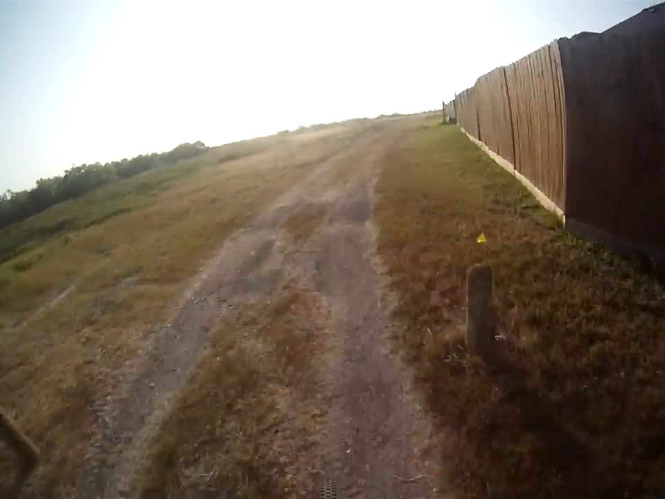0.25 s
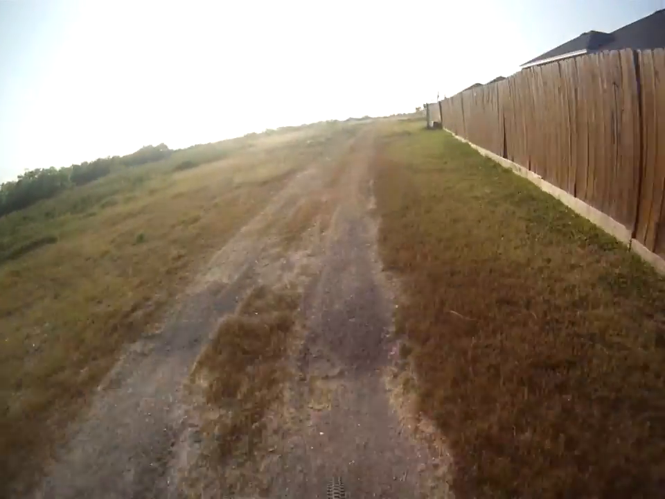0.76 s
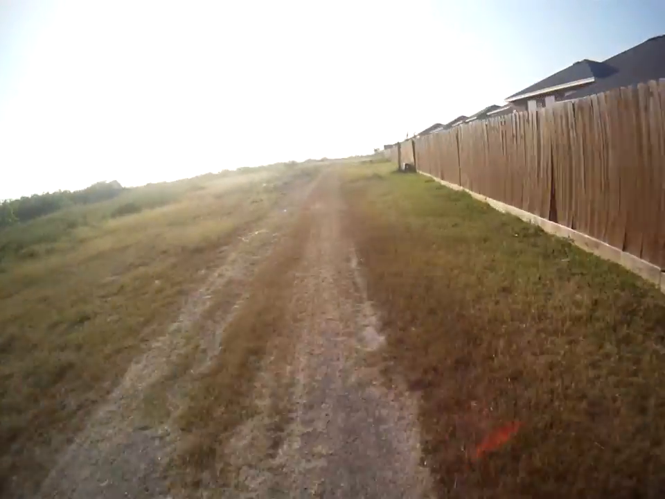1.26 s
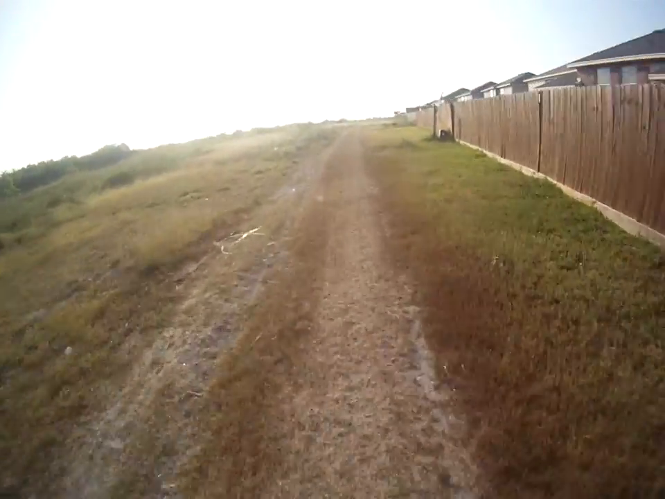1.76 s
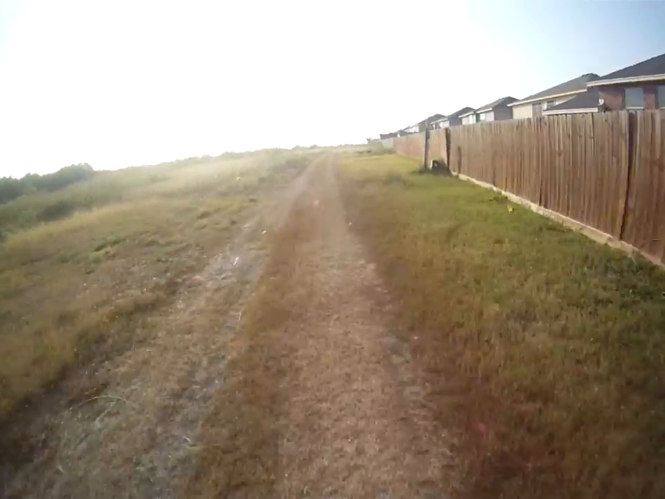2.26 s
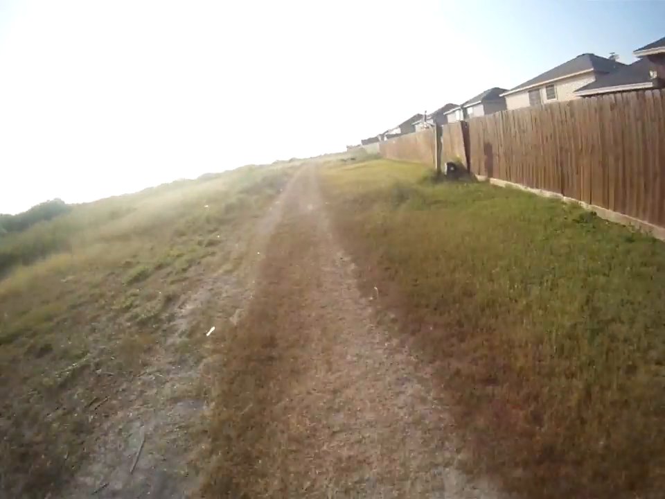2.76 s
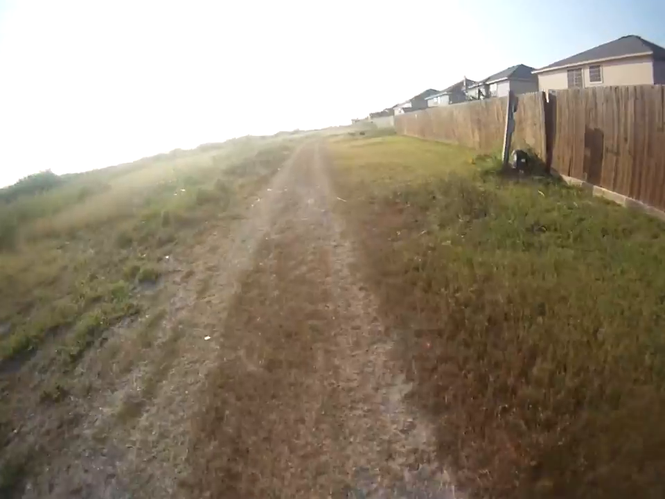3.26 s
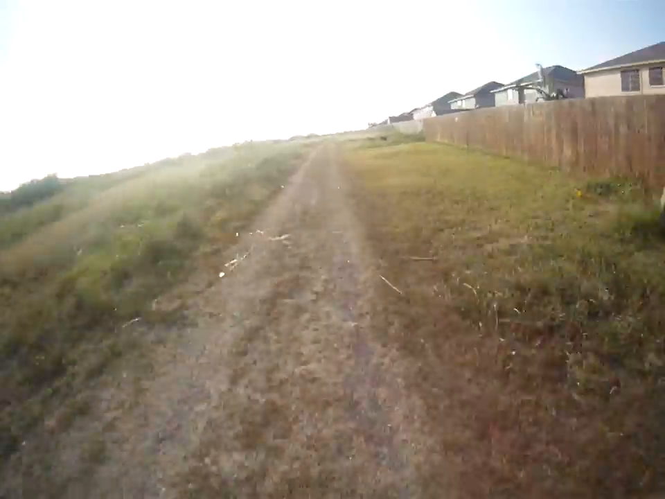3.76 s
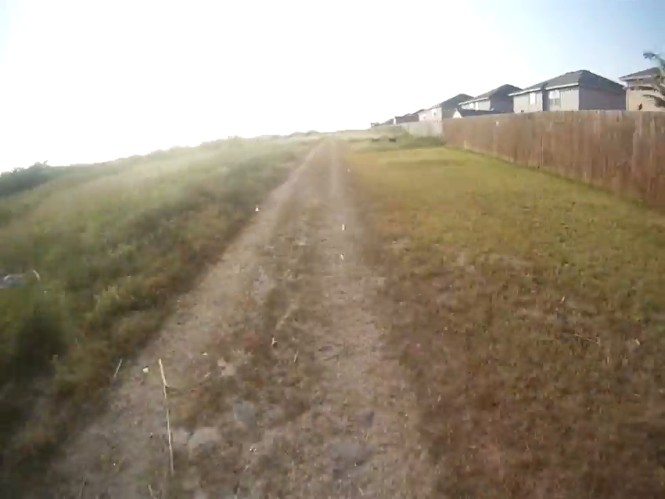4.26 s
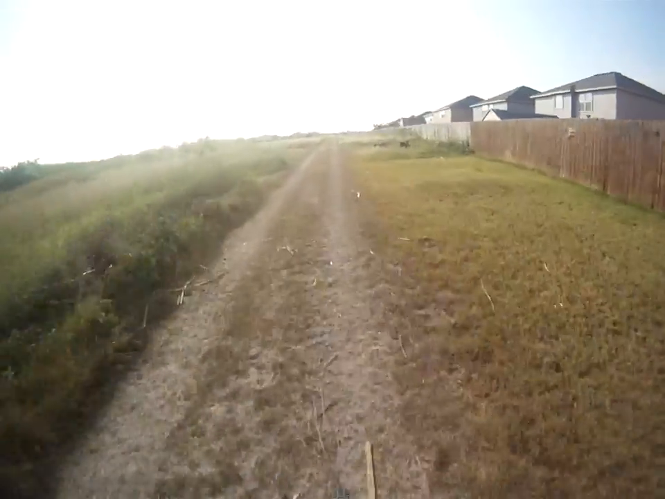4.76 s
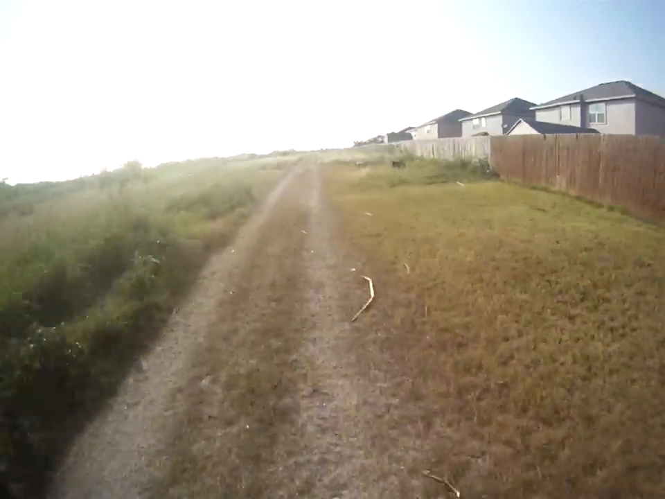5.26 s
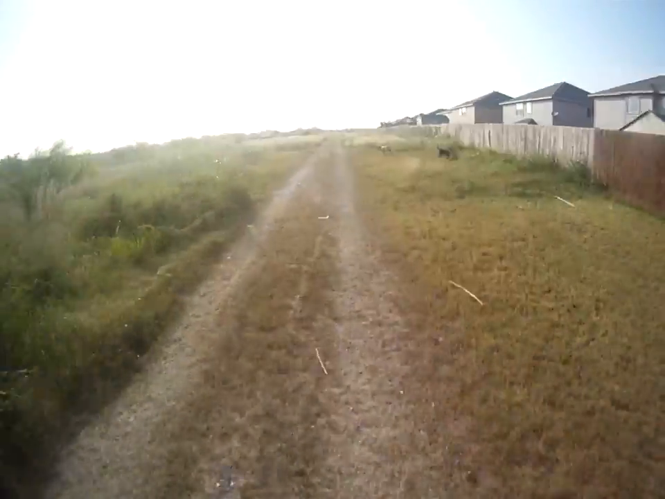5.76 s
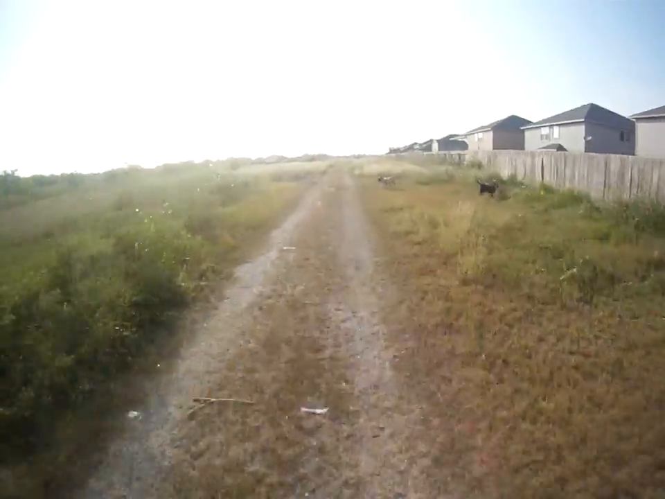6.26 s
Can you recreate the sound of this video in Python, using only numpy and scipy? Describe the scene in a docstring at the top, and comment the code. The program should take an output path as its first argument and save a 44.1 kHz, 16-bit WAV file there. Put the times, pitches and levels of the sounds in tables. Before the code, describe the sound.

A bicycle rides onto a rough dirt track, its mounted camera case clacking sharply over low thuds, wind rumble and faint gritty tyre hiss.

```python
"""A bicycle rolls from smooth ground onto a rough dirt track, heard from a small camera riding along.
Big bumps make the springy mount swing with low thuds, and its plastic case knocks and rings; stones jog it too.
Wind and the shuddering frame are shaped noise, tyres hiss over grit and dry grass, and twigs snap.
A brake squeaks faintly at first, as a tone with sliding harmonics, and the microphone adds hiss.
The camera samples coarsely, which mirrors every clack into the treble."""
import sys
import numpy as np
from scipy import signal
from scipy.fft import rfft, irfft
from scipy.io import wavfile

SR = 44100
rng = np.random.default_rng(int(sys.argv[2]) if len(sys.argv) > 2 else 0)


def unload_wav(signal):
    """Save mono or channel-first audio to the path in sys.argv[1] as 16-bit WAV at rate SR, clipped to [-1, 1]."""
    wavfile.write(
        sys.argv[1],
        SR,
        np.round(np.clip(np.atleast_2d(signal).T, -1, 1) * 32767).astype(np.int16),
    )


N = 287532

# wind on the case, level before an overall lift: [t/s, level/dB]
WIND_GUSTS = [(0.0, -38.5), (0.34, -52), (1.0, -46.5), (1.36, -50), (1.76, -45.5), (1.94, -48.5),
              (2.83, -52.5), (3.01, -48), (4.47, -40.5), (4.57, -35.5), (4.94, -42.5), (5.59, -42),
              (5.9, -32.5), (6.52, -46.5)]
# how rough the ground is, as the level of the tyres' hiss: [t/s, level/dB]
GROUND_ROUGHNESS = [(0.0, -58), (0.49, -61), (0.62, -59.5), (1.09, -59), (1.69, -64.5), (1.78, -61.5),
                    (2.4, -62), (3.98, -60), (4.54, -47.5), (4.83, -54), (5.54, -54), (5.74, -52.5),
                    (5.96, -56), (6.15, -55.5), (6.41, -50), (6.52, -50.5)]
# tone colour of each noise, relative level per Hz: [f/Hz, level/dB]
WIND_SPECTRUM = [(8, -10.5), (22, -5.5), (45, -1.5), (66, -5.5), (90, -17), (130, -29), (300, -40.5),
                 (900, -73.5)]
FRAME_SPECTRUM = [(60, 0.5), (130, -3), (260, -1.5), (400, -6), (620, -9.5), (1200, -19.5), (4000, -71)]
DIRT_SPECTRUM = [(200, -29.5), (600, -11.5), (850, -9.5), (1150, -2), (1500, -2), (2250, -2), (2650, -8.5),
                 (3100, -12.5), (3800, -16.5), (5500, -31.5)]
GRASS_SPECTRUM = [(300, -38), (680, -15), (850, -9), (1060, -2.5), (1300, -6), (2050, -6.5), (2550, -13.5),
                  (3400, -19.5), (4200, -30.5), (5500, -33.5)]
MIC_HISS_SPECTRUM = [(100, 2.5), (1500, -23.5), (3000, -9), (5200, -4.5), (5900, -11)]
# stalks and grit brush past, level before an overall cut: [t/s, length/s, level/dB]
BRUSHES = [(1.366, .033, -41), (1.586, .025, -51), (1.7, 0.046, -53.5), (1.949, 0.048, -54),
           (2.349, 0.072, -51), (2.651, 0.1, -53.5), (2.93, 0.084, -53), (3.535, .06, -51),
           (5.637, 0.095, -47), (5.864, 0.061, -48)]
# the case knocks against its mount: [t/s, peak level of the shell's clack/dB, of the dull push behind it/dB]
KNOCKS = [(0.0122, -14, -32), (0.27, -50, -42), (0.5146, -34.5, -30.5), (0.7888, -49, -31.5),
          (1.0439, -8.5, -26.5), (1.087, -27.5, -29), (1.1013, -38, -29.5), (1.3687, -32, -56),
          (1.5632, -27, -34), (1.6146, -36.5, -60), (1.7052, -42, -57), (1.7517, -42, -62),
          (1.8317, -26, -30), (1.859, -27, -29), (1.8624, -25.5, -23.5), (1.8721, 2, -21),
          (2.1331, -41.5, -44), (2.3126, -28, -28.5), (2.3316, -45.5, -35.5), (3.0877, -23.5, -44.5),
          (3.264, -53, -40.5), (3.455, -60, -32), (3.5337, -27.5, -28), (3.6621, -50, -34.5),
          (3.9385, -42, -32.5), (4.089, -37, -34), (4.1305, -33.5, -34.5), (4.1565, -34, -33.5),
          (4.4682, -27, -23), (4.4786, 0, -24), (4.597, -34, -30), (4.6328, -30.5, -30),
          (4.6485, -8.5, -28.5), (4.8648, -40, -33), (5.201, -24.5, -24), (5.2865, -29.5, -39),
          (5.3168, 1, -21.5), (5.366, -33.5, -33.5), (5.566, -62, -30.5), (5.6549, -32, -28),
          (5.6993, -6.5, -22), (5.7223, -13.5, -18.5), (5.8102, -10, -28.5), (5.9034, -42, -31.5),
          (5.987, -38, -32), (6.1933, -18, -18.5), (6.2381, -15.5, -30), (6.2418, -8, -25.5),
          (6.3257, -40, -41)]
# resonances of the shell, the mount, the dull push and the contact snap: [f/Hz, width/Hz, relative level/dB]
SHELL_MODES = [(1451, 190, -6.5), (1712, 430, 0.5), (1962, 284, -0.5), (2154, 107, -7.5), (2610, 370, -7.5),
               (3120, 220, -17.5)]
MOUNT_MODES = [(798, 207, -5.5), (1021, 136, -1), (1185, 430, -6)]
PUSH_MODES = [(126.7, 150, 1.5), (253.7, 111, -4), (443, 243, -9.5)]
SNAP_MODES = [(3200, 220, 2.5), (3706, 380, 3), (4920, 450, -7.5), (5660, 160, -21)]
# big bumps in the track shake the mount: [t/s, peak level/dB, f/Hz]
BUMPS = [(0.05, -24, 44.8), (0.104, -23.5, 54), (0.272, -32.5, 63), (0.527, -27, 55), (0.696, -34, 47),
         (1.047, -23, 43.2), (1.117, -24.5, 54.6), (1.573, -22, 54), (1.86, -13.5, 50.1), (2.33, -34, 55),
         (2.866, -31.5, 48.5), (2.934, -31, 61.5), (3.54, -30, 56.4), (3.663, -26, 62),
         (3.945, -24.5, 56.5), (4.131, -24, 44), (4.206, -25, 55.7), (4.391, -29, 57), (4.468, -16.5, 55.6),
         (4.611, -24.5, 64.7), (4.652, -22, 49.7), (4.728, -25.5, 59), (4.986, -26, 47.7), (5.2, -24, 41.5),
         (5.312, -19.5, 49), (5.718, -13.5, 47.2), (5.815, -20.5, 63), (5.873, -20, 50.3),
         (6.045, -12, 58.4), (6.197, -11.5, 58), (6.247, -21, 48.4), (6.361, -18, 55.3)]
# the brake rubs twice, each a curve before the brake arm shapes it: [t/s, f/Hz, level/dB]
BRAKE_RUBS = [
    [(.06, 1010, -61), (.095, 985, -59), (.148, 1140, -53), (.175, 975, -63), (.209, 900, -71)],
    [(.27, 1100, -70), (.291, 1086, -55), (.329, 971, -58.5), (.379, 966, -64), (.43, 1021, -55.5),
     (.48, 1067, -61), (.545, 1016, -57), (.6, 795, -72)],
]
# how well the brake arm radiates: [f/Hz, level/dB]
BRAKE_ARM_RESPONSE = [(1000, -23), (1500, -11), (1950, -1.5), (2300, 2), (2700, -17), (3150, -16),
                      (3500, -10), (3850, -9), (4200, -28), (4600, -25)]
# dry twigs snap under the tyres, peak of the first snap: [about t/s, level/dB, main f/Hz]
TWIGS = [(1.21, -52, 3500), (1.764, -54, 4300), (2.378, -50, 4450), (2.972, -52, 3200), (3.008, -51, 3200),
         (4.524, -47, 3700), (5.906, -43, 5600), (6.031, -50, 3400), (6.16, -49, 3700)]

CAMERA_HZ, EDGE_HZ = 12000, 15500  # the camera's sampling rate, and the top edge of what it passes on
SMOOTH_DB = -61  # ground level that counts as smooth
# frame and rattles follow the ground: level on smooth ground (dB), dB gained per dB of roughness
FRAME_DB, FRAME_FOLLOWS = -63, 0.49
RATTLE_DB, RATTLE_FOLLOWS = -55.5, 0.58
REFERENCE_DB = -30  # clack and push level that the snap and graze settings start from
# contact snap: level at the reference (dB), dB gained per dB of clack, dB lost per dB of cushioning push
SNAP_DB, SNAP_PER_CLACK, SNAP_CUSHION = -52.5, 1, 0.21
# the mount rings this far over the clack, but no further than this over the push (dB)
MOUNT_OVER_CLACK_DB, MOUNT_OVER_PUSH_DB = 0.5, 6.5
# the case grazes its stop before landing: lead (s), level at the reference (dB), dB gained per dB of clack
GRAZE_S, GRAZE_DB, GRAZE_PER_CLACK = .0032, -42, 0.43
SPREAD_DB = 2  # each blow lands a little differently: spread of its resonances' levels


def amp(db):
    """Turns decibels into gain."""
    return 10 ** (np.asarray(db) / 20)


def evened(x):
    """Scales a sound to an average (rms) strength of 1."""
    return x / np.sqrt(np.mean(x ** 2) + 1e-20)


def add(mix, start_s, sound):
    """Mixes a sound in at a moment given in seconds."""
    part = mix[max(round(start_s * SR), 0):][:len(sound)]
    part += sound[:len(part)]


def curve(rows):
    """Joins rows of (seconds, value) with straight lines, one value a sample."""
    return np.interp(np.arange(N) / SR, *np.transpose(rows))


def coloured(x, spectrum):
    """Makes some pitches of a noise stronger than others, at rms 1."""
    hz, db = np.transpose(spectrum)
    f = np.fft.rfftfreq(len(x), 1 / SR)
    gain = amp(np.interp(np.log(f + 1), np.log(hz), db))
    return evened(irfft(rfft(x) * gain, len(x)))


def wander(rate_hz):
    """Drifts smoothly at random with rms 1, up to about this rate."""
    f = np.fft.rfftfreq(N, 1 / SR)
    slowed = rfft(rng.standard_normal(N)) / (1 + (f / rate_hz) ** 4)
    return evened(irfft(slowed, N))


def ring(modes, spread_db, detune, damping=1, size=4096):
    """A blow on a set of resonances, peak 1; more damping widens them, so they die away sooner."""
    f = abs(np.fft.fftfreq(size, 1 / SR))
    gain = np.zeros(size)
    for hz, width, db in modes:
        centre = hz * (1 + detune * rng.standard_normal())
        off = 2 * (f - centre) / (width * damping)
        gain += amp(db + spread_db * rng.standard_normal()) / (1 + off ** 2) ** 1.53
    # choose the phases that put the energy right after the blow
    spectrum = np.exp(np.conj(signal.hilbert(np.log(gain + 1e-5))))
    causal = np.fft.ifft(spectrum).real
    return causal / abs(signal.hilbert(causal)).max()


def wind_rumble(wind_db=3, gust_db=3.0):
    """Wind buffets the case: low noise that swells with the gusts."""
    level = curve(WIND_GUSTS) + wind_db + gust_db * wander(5)
    return coloured(rng.standard_normal(N), WIND_SPECTRUM) * amp(level)


def frame_shudder():
    """The frame shudders over the ground: low noise, stronger where it is rough."""
    level = FRAME_DB + FRAME_FOLLOWS * (curve(GROUND_ROUGHNESS) - SMOOTH_DB)
    shudder = amp(1.6 * wander(25))
    return coloured(rng.standard_normal(N), FRAME_SPECTRUM) * amp(level) * shudder


def tyres(grit_per_s=350, grit_spread_db=2.0, grit=0.47, brush_db=-3, bare_db=-62, grassy_db=-55, patchy_db=1.5):
    """Tyres crush grit and dry grass: a wash of noise with small snaps, and stalks that swish by."""
    ground = amp(curve(GROUND_ROUGHNESS))
    snap_size = amp(grit_spread_db * np.minimum(rng.exponential(1, N), 4))
    snap_happens = rng.random(N) < grit_per_s / SR
    snaps = rng.standard_normal(N) * snap_size * snap_happens
    crunch = rng.standard_normal(N) + grit * evened(snaps)
    # louder ground sounds more like grass than dirt
    grassy = np.interp(ground, amp([bare_db, grassy_db]), [0, 1])
    dirt = np.sqrt(1 - grassy) * coloured(crunch, DIRT_SPECTRUM)
    grass = np.sqrt(grassy) * coloured(crunch[::-1], GRASS_SPECTRUM)  # reversed, so it differs from the dirt
    swish = np.zeros(N)
    for s, length, db in BRUSHES:
        u = np.arange(SR // 3) / SR / length
        add(swish, s, amp(db + brush_db) * (1 - np.exp(-20 * u)) * np.exp(-u ** 2))
    flutter = amp(.9 * wander(45))
    catching = amp(3 * wander(160))
    patchy_ground = amp(patchy_db * wander(6)) * ground
    return (dirt + grass) * flutter * np.hypot(patchy_ground, swish * catching)


def microphone_hiss():
    """The microphone's own steady, faint noise."""
    return amp(-66.5) * coloured(rng.standard_normal(N), MIC_HISS_SPECTRUM)


def knocks(rebound_s=0.002008, rebound=0.38, light_damping=2.22, chatter=0.86, mount_chatter=.3):
    """The case grazes, then rings shell and mount; hard knocks rebound once off the stop, light ones chatter."""
    out = np.zeros(N)
    for s, clack, push in KNOCKS:
        hard, heavy = clack - REFERENCE_DB, push - REFERENCE_DB
        mount_db = min(clack + MOUNT_OVER_CLACK_DB, push + MOUNT_OVER_PUSH_DB)
        snap_db = SNAP_DB + SNAP_PER_CLACK * hard - SNAP_CUSHION * heavy
        graze_db = GRAZE_DB + GRAZE_PER_CLACK * hard
        light = clack < -20
        detune = .04 if light else .007
        damping = light_damping if light else 1

        shell = amp(clack) * ring(SHELL_MODES, SPREAD_DB, detune, damping)
        snap = amp(snap_db) * ring(SNAP_MODES, SPREAD_DB, 0.025)
        case = shell + snap
        mount = -amp(mount_db) * ring(MOUNT_MODES, SPREAD_DB, 0.036, damping)
        graze = amp(graze_db) * ring(SHELL_MODES + MOUNT_MODES, SPREAD_DB, .04, light_damping)
        add(out, s - GRAZE_S, graze)
        add(out, s, case + mount)
        # the push begins half a millisecond before the clack
        add(out, s - .0005, -amp(push) * ring(PUSH_MODES, SPREAD_DB, 0.068))
        if light:
            for k, late in enumerate(np.cumsum(rng.uniform(.0008, .003, size=3))):
                add(out, s + late, (chatter * case + mount_chatter * mount) / (k + 1))
        else:
            add(out, s + rebound_s, rebound * case)
    return out


def bumps(rise_s=0.036, decay_s=0.016):
    """The springy mount swings a few times after each bump, a low thud that soon dies away."""
    out, t = np.zeros(N), np.arange(SR // 4) / SR
    for s, db, hz in BUMPS:
        swing = -np.sin(2 * np.pi * hz * t) * (1 - np.exp(-t / rise_s)) * np.exp(-t / decay_s)
        add(out, s, amp(db) * swing / abs(swing).max())
    return out


def brake_squeak():
    """The brake sticks and slips: a thin tone whose harmonics slide through the brake arm's resonances."""
    out, t = np.zeros(N), np.arange(N) / SR
    for rub in BRAKE_RUBS:
        s, hz, db = np.transpose(rub)
        pitch = np.interp(t, s, hz) * (1 + .006 * wander(150))
        turns = np.cumsum(pitch) / SR
        tone = np.zeros(N)
        for k in range(1, 6):
            arm_db = np.interp(k * pitch, *np.transpose(BRAKE_ARM_RESPONSE))
            tone += amp(arm_db) * np.sin(2 * np.pi * k * turns)
        level = amp(np.interp(t, s, db) + wander(60))
        rubbing = (t > s[0]) * (t < s[-1])
        out += np.sqrt(2) * tone * level * rubbing
    return out


def rattles(count=20, spread_db=3, push_db=5):
    """Small stones jog the case at random moments, harder on rough ground."""
    out = np.zeros(N)
    level = RATTLE_DB + RATTLE_FOLLOWS * (curve(GROUND_ROUGHNESS) - SMOOTH_DB)
    for at in rng.integers(0, N, count):
        shell = ring(SHELL_MODES, SPREAD_DB, .04, 2.4)
        push = amp(push_db) * ring(PUSH_MODES, SPREAD_DB, 0.059)
        strength = amp(level[at] + spread_db * rng.standard_normal())
        add(out, at / SR, strength * (shell - push))
    return out


def twigs():
    """Each twig breaks in three quick, bright snaps, each weaker; thinner twigs snap higher."""
    out = np.zeros(N)
    for s, db, pitch_hz in TWIGS:
        scale = pitch_hz / SNAP_MODES[1][0]
        modes = [(hz * scale, width, level) for hz, width, level in SNAP_MODES]
        for k, late in enumerate(np.cumsum(rng.uniform(0.0015, 0.0036, size=3))):
            crack = ring(modes, SPREAD_DB, .04)
            add(out, s + late - .002, amp(db - 4.5 * k) * crack)
    return out


def scene():
    """Everything that reaches the microphone, with its own hiss."""
    steady = wind_rumble() + frame_shudder() + tyres() + microphone_hiss()
    events = knocks() + bumps() + brake_squeak() + rattles() + twigs()
    return (steady + events)[None]


def record(dry):
    """Coarse sampling that overloads at full scale; holding samples mirrors sound about the sampling rate."""
    coarse = np.clip(signal.resample_poly(dry[0], CAMERA_HZ, SR), -1, 1)
    # hold each sample for four steps, then return to the output rate
    held = signal.resample_poly(np.repeat(coarse, 4), SR, 4 * CAMERA_HZ)[1:N + 1]
    held = np.pad(held, (0, N - len(held)))
    lowpass = signal.firwin(255, EDGE_HZ, window=("kaiser", 9), fs=SR)
    return signal.oaconvolve(held, lowpass, "same")[None]


dry = scene()
out = record(dry)
unload_wav(out)
```